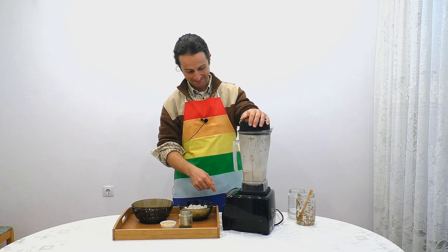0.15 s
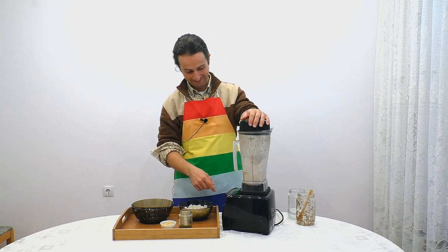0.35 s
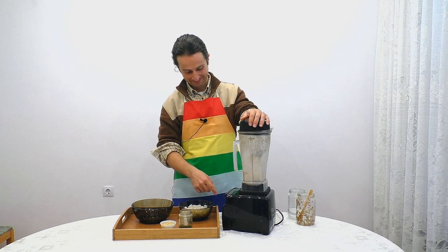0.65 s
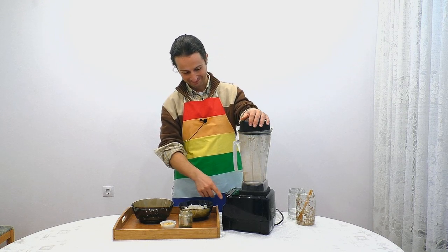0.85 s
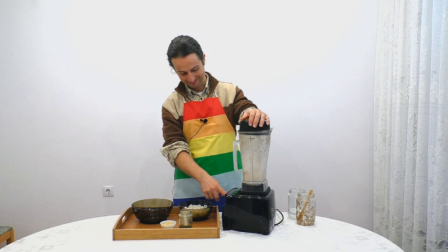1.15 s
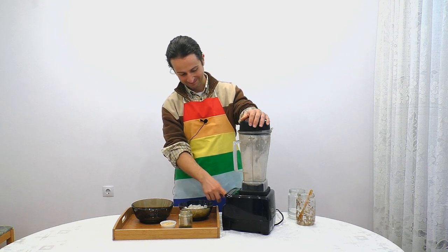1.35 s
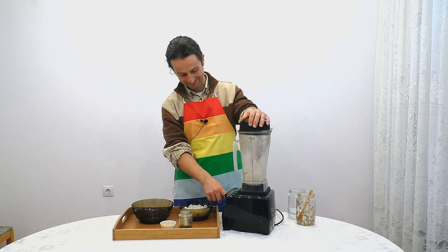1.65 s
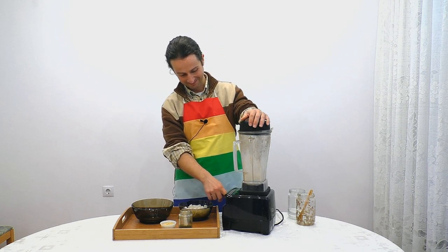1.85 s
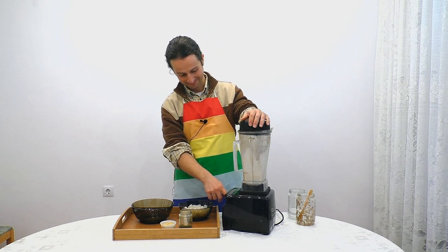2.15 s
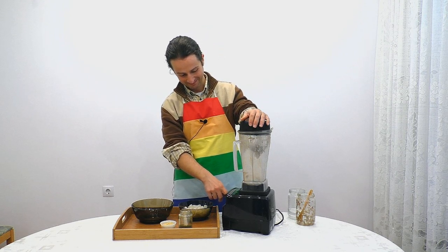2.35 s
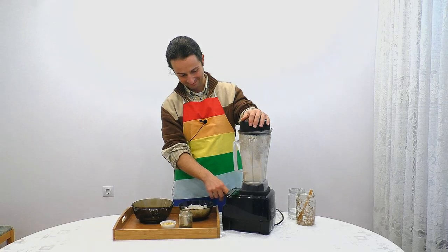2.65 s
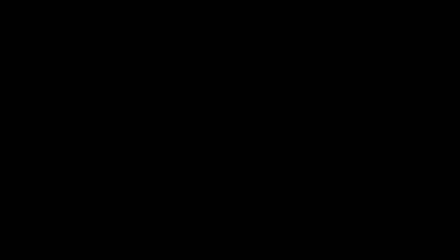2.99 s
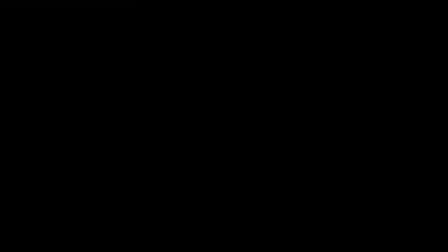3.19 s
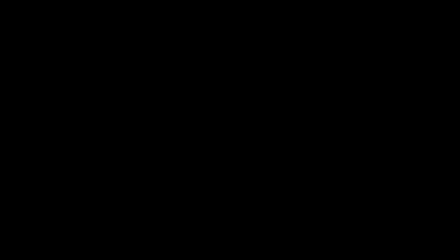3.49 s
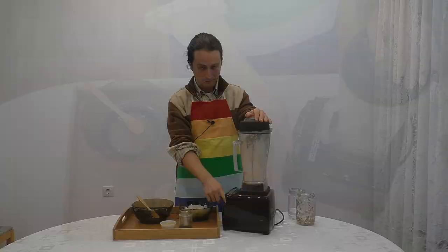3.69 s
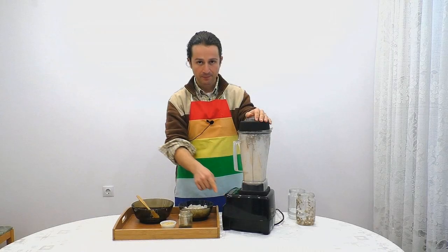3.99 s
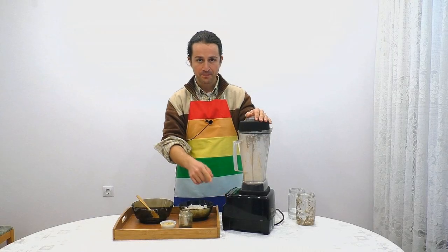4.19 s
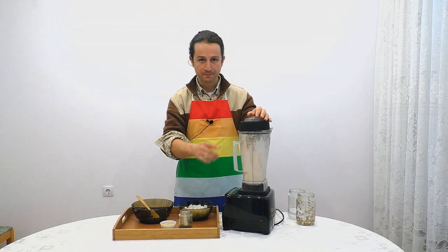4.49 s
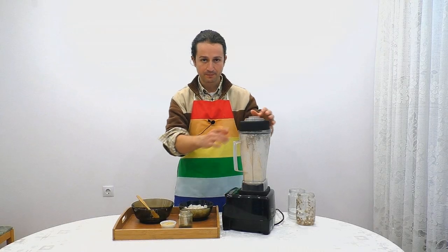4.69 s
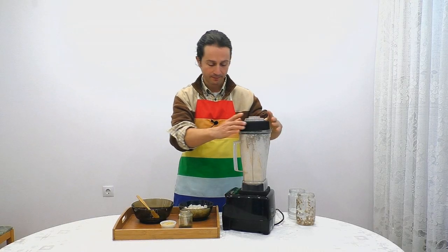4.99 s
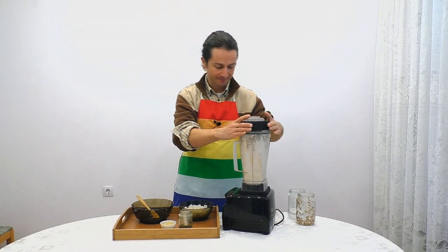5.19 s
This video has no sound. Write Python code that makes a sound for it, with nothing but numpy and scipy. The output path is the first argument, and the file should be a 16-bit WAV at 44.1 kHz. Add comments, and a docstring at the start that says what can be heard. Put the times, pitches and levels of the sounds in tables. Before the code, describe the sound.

A blender grinds seeds in water with a surging motor, cuts to silence, returns briefly, then clicks off and winds down in falling pitch.

```python
"""Blender grinding seeds

A blender grinds seeds in water on a table: shaft-order hum, armature slot whine, blade blows and fan air.
Its motor hunts up and down in speed about three times a second, and seeds knock the jar in noise bursts.
The sound fades out, stays silent and fades in again; the switch snaps off and the shaft coasts down.
Just before 5 s the blender drops away: room hiss and low rumble come up, with fingers tapping the lid.
"""
import sys
import numpy as np
from scipy import signal
from scipy.fft import rfft, irfft, next_fast_len
from scipy.io import wavfile

SR = 44100
rng = np.random.default_rng(int(sys.argv[2]) if len(sys.argv) > 2 else 0)


def output_pcm(signal):
    """Save a mono or channel-first signal as 16-bit PCM at the path in sys.argv[1].

    Samples are clipped to [-1, 1] before scaling.
    """
    pcm = np.clip(np.atleast_2d(signal).T, -1, 1) * 32767
    wavfile.write(sys.argv[1], SR, np.round(pcm).astype(np.int16))


def gain_from_decibels(decibels):
    """Convert decibel values to linear amplitude factors."""
    exponent = np.asarray(decibels, float) / 20
    return 10 ** exponent


N = 235579
MAINS_PULSE_HZ = 100
SWITCH_OFF_S, SILENCE_S = 3.912, 3.4


def rms_one(x):
    """Scale to rms 1."""
    return x / np.sqrt(np.mean(x ** 2) + 1e-20)


def drift(rate_hz):
    """Slow random wander of rms about 1: noise through two equal one-pole lowpasses."""
    r = np.exp(-2 * np.pi * rate_hz / SR)
    noise = rng.standard_normal(N + SR)
    return rms_one(signal.lfilter([1], [1, -2 * r, r * r], noise)[SR:])


def response_db(hz, spectrum, resonances):
    """Smooth spectrum with bell-shaped resonances added in dB."""
    points = np.array(spectrum)
    level_db = np.interp(np.log(hz + 1), np.log(points[:, 0]), points[:, 1])
    return level_db + sum(db / (1 + (2 * (hz - centre) / width) ** 2) for centre, width, db in resonances)


def colour(x, spectrum, resonances=()):
    """Minimum-phase filter: nothing rings before it is struck."""
    size = next_fast_len(N + SR)
    gain = gain_from_decibels(response_db(np.fft.rfftfreq(size, 1 / SR), spectrum, resonances))
    cepstrum = irfft(np.log(gain), size)
    # fold onto positive time
    cepstrum[1:size // 2] *= 2
    cepstrum[size // 2 + 1:] = 0
    return irfft(rfft(x, size) * np.exp(rfft(cepstrum)), size)[:N]


def grains(per_s, spread_db):
    """Random clicks of uneven size and either sign."""
    sizes = gain_from_decibels(spread_db * np.minimum(rng.exponential(1, N), 5)) * rng.choice([-1, 1], N)
    return sizes * (rng.random(N) < per_s / SR)


def puffs(events, decay_s):
    """Short decaying noise bursts at the given moments."""
    out = np.zeros(N + 800)
    fade = np.exp(-np.arange(800) / (decay_s * SR))
    for (s, db), noise in zip(events, rng.standard_normal((len(events), 800))):
        start = round(s * SR)
        out[start:start + 800] += gain_from_decibels(db) * fade * noise
    return out[:N]


# fastest and slowest moments of the hunting motor, in turn: t/s, speed/(turns/s)
SPEED_TURNING_POINTS = [(-0.042, 193.2), (0.094, 178.3), (0.279, 193.5), (0.436, 174.8), (0.588, 195.3),
                        (0.742, 176.5), (0.922, 195.0), (1.068, 173.6), (1.252, 196.4), (1.412, 175.5),
                        (1.605, 197.2), (1.785, 175.6), (1.968, 195.5), (2.1, 172.0), (2.295, 197.4),
                        (2.453, 173.8), (2.634, 198.4), (2.809, 177.8), (2.994, 196.4), (3.13, 174.8),
                        (3.62, 196.0), (3.73, 193.8), (3.9, 200.4)]


def shaft_speed():
    """Speed swings between turning points; after switch-off, friction and square-law drag slow it."""
    t = np.arange(N) / SR
    s, turning = np.transpose(SPEED_TURNING_POINTS)
    count = np.arange(len(s))
    place = np.interp(t, s, count)
    height = (.5 + .5 * np.cos(np.pi * place)) ** .85   # exponent < 1 lingers at the top
    step = np.floor(place)
    driven = np.interp(step + np.where(step % 2, height, 1 - height), count, turning)
    friction, drag = 138, .0059   # loss of turns/s per s: friction + drag * speed^2
    balance = np.sqrt(friction / drag)
    angle = np.arctan(turning[-1] / balance) - np.sqrt(friction * drag) * (t - SWITCH_OFF_S)
    coasting = balance * np.tan(np.clip(angle, 0, np.pi / 3))
    return np.where(t < SWITCH_OFF_S, driven, coasting), place / 2 % 1


# base levels between surges: t/s, hum level/dB, churning level/dB, spray level/dB, whine level/dB
VOICE_LEVELS = [(0, -34, -31, -43.5, -44.5), (.45, -39.5, -33, -46, -49), (.9, -38, -33, -45, -47.5),
                (1.45, -42.5, -34.5, -47.5, -44), (1.85, -37, -32, -44, -45.5), (2.2, -40.5, -34, -48, -45),
                (2.6, -40, -32, -46, -44), (3.06, -42.5, -33, -48.5, -48), (3.67, -40, -30, -43.5, -45.5),
                (3.8, -38.5, -30, -43.5, -46), (3.9, -41, -30, -45.5, -44), (3.97, -37, -31.5, -45, -51.5),
                (4.15, -42, -32, -51, -52), (4.298, -46.5, -34, -50, -56), (4.6, -58, -37.5, -51, -59.5),
                (4.78, -58, -41.5, -58.5, -60.5), (4.87, -59, -49.5, -71.5, -69),
                (4.96, -81, -55, -69.5, -77)]
# one swing, fastest through slowest (.5) and back: share of swing, hum change/dB, whine change/dB
SWING_LEVELS = [(0, 2, 0.5), (.1, -3, -1.5), (.24, -3.5, -1), (0.359, 4.5, -10.5), (.5, 0, -1),
                (.62, -4, -8), (.76, -4, -1.5), (.88, 4, -2.5), (1, 4.5, 1.5)]
# seed mix falls back on the blades: t/s, churning rise/dB, spray rise/dB
FALLBACK_SURGES = [(0.03, 3, 5.5), (0.375, 5, 6.5), (0.665, 6.5, 7), (1.008, 8, 5.5), (1.327, 7.5, 6.5),
                   (1.705, 6.5, 6), (2.035, 7, 1.5), (2.388, 7.5, 6), (2.721, 4, 6.5), (3.06, 3, 2),
                   (3.68, 6, 5)]


def source_levels(swing_share):
    """Hum and whine follow the swing until the silence; churning and spray rise in surges."""
    t = np.arange(N) / SR
    s, hum_db, churn_db, spray_db, whine_db = np.transpose(VOICE_LEVELS)
    share, hum_swing_db, whine_swing_db = np.transpose(SWING_LEVELS)
    hunting = t < SILENCE_S
    s_surge, churn_rise_db, spray_rise_db = np.transpose(FALLBACK_SURGES)
    since = t - s_surge[:, None]
    rise_s, fall_s = 0.049, 0.047
    bumps = np.exp(-.5 * (since / np.where(since < 0, rise_s, fall_s)) ** 2)
    hum_now = np.interp(t, s, hum_db) + hunting * np.interp(swing_share, share, hum_swing_db)
    whine_now = np.interp(t, s, whine_db) + hunting * np.interp(swing_share, share, whine_swing_db)
    churn_now = np.interp(t, s, churn_db) + churn_rise_db @ bumps
    spray_now = np.interp(t, s, spray_db) + spray_rise_db @ bumps
    return hum_now, whine_now, churn_now, spray_now


# low shaft orders: multiple of shaft rate, level/dB re hum
HUM_ORDERS = [(1, -1), (2, -6), (3, -7), (4, -9), (5, -7), (10, -16.5), (12, -24.5)]
# low room and table modes: f/Hz, t60/s, level at resonance/dB
LOW_MODES = [(60.6, 0.62, 8.5), (100.3, 0.9, 4.5), (128.5, 0.43, 16.5), (145.6, 0.69, 9),
             (177.7, 0.39, 6.5), (195.8, 0.96, 15), (294, 0.21, 3), (357.4, 0.62, 8), (394.2, 0.67, 8),
             (528.4, .4, 0.5), (594.5, 0.35, 6.5), (780, 0.32, -1)]


def hum(turns, hum_db):
    """Unbalanced rotor shakes the base once a turn; modes ring on and beat with the gliding pitch."""
    t = np.arange(N) / SR
    tones = 0
    for k, db in HUM_ORDERS:
        level_db = db + 4.8 * (k > 1) * drift(17)
        tones = tones + gain_from_decibels(level_db) * np.sin(2 * np.pi * k * turns + k)
    # side tones a mains pulse away
    depth = 0.15 * gain_from_decibels(7.0 * drift(4.2)) * (t < SWITCH_OFF_S)
    torque = 1 + depth * np.cos(2 * np.pi * MAINS_PULSE_HZ * t)
    shake = np.sqrt(2) * gain_from_decibels(hum_db) * torque * tones
    # a small base radiates little bass
    out = gain_from_decibels(-3) * colour(shake, [(30, -23.5), (90, -8.5), (170, 0.5), (1000, -2)])
    for hz, t60, db in LOW_MODES:
        r, w = gain_from_decibels(-60 / (t60 * SR)), 2 * np.pi * hz / SR
        ring = signal.lfilter([(1 - r * r) / 2, 0, (r * r - 1) / 2], [1, -2 * r * np.cos(w), r * r], shake)
        out = out + gain_from_decibels(db) * ring
    return out


# armature slot orders: multiple of shaft rate, level/dB re whine, added level after silence/dB
WHINE_ORDERS = [(11, -7, 3), (22, -11, 9), (27, -17, 7), (44, 0, -1), (51, -16, -3), (58, -22, 8),
                (61, -13, 1), (66, -4.5, 3), (73, -15, -4), (88, -6, 5), (110, -2.5, 0), (132, -4.5, 0),
                (154, -7, 0), (176, -11, 0), (198, -11, 0), (220, -12, 0)]
# housing resonances: f/Hz, width/Hz, level/dB
HOUSING_RESONANCES = [(2185, 120, 16), (3350, 450, 15), (4300, 250, 5), (5300, 500, 11), (6400, 500, 15),
                      (7400, 200, 8), (7950, 330, 8), (8500, 450, 14), (9650, 280, 13), (10250, 300, 12),
                      (11700, 350, 7), (12900, 450, 7)]


def whine(speed, turns, whine_db):
    """Slot tones ride the speed, swell at housing resonances; the uneven air gap pulses them once a turn."""
    out = 0
    wobble_turns = .0009 * drift(60)
    later = np.arange(N) / SR > SILENCE_S
    tilt = [(100, -14), (10500, -11), (13200, -14), (15000, -19), (16500, -70)]
    for k, db, later_db in WHINE_ORDERS:
        housing_db = response_db(k * speed, tilt, HOUSING_RESONANCES)
        level_db = db + later_db * later + housing_db + 2.0 * drift(40)
        out = out + gain_from_decibels(level_db) * np.sin(2 * np.pi * k * (turns + wobble_turns))
    pulse = 1 + .25 * np.cos(2 * np.pi * turns)
    return np.sqrt(2) * gain_from_decibels(whine_db) * pulse * out


def room(x):
    """Reverberation as a dull noise tail that dies away."""
    t60_s, room_db = .4, -11
    t = np.arange(int(.6 * SR)) / SR
    dull = signal.lfilter([.4], [1, -.6], rng.standard_normal(len(t)))
    tail = dull * gain_from_decibels(-60 * t / t60_s) * (t > .006)
    return gain_from_decibels(room_db) * signal.fftconvolve(x, tail / np.sqrt(np.sum(tail ** 2)))[:N]


# hard grinding spectrum: f/Hz, relative level per Hz/dB
GRIND_SPECTRUM = [(25, -48.5), (60, -23), (150, -13), (260, -8.5), (500, -5), (1100, -8.5), (2200, -11.5),
                  (2700, -21.5), (4000, -27), (8000, -39)]
# blade blows in water, sloshing as the blades slow: f/Hz, relative level per Hz/dB
SLOSH_SPECTRUM = [(25, -38), (70, -19), (120, -4.5), (300, -8), (530, -3.5), (800, -12.5), (1700, -14.5),
                  (3300, -20), (4200, -33), (8000, -48.5)]
# spray spectrum: f/Hz, relative level per Hz/dB
SPRAY_SPECTRUM = [(1500, -24.5), (2700, 5), (4000, 0.5), (6000, -1.5), (7200, 1.5), (9000, -7),
                  (16000, -19.5)]
# jar and table resonances: f/Hz, width/Hz, level/dB
JAR_RESONANCES = [(123, 17, 4), (363, 45, 4.5), (550, 85, 5.5), (821.6, 76, 7.5), (1515, 290, 4),
                  (1801, 80, 6), (2060, 41, 4), (2170, 14, 8)]
# housing colours noise more gently than tones: f/Hz, width/Hz, level/dB
VENT_RESONANCES = [(hz, width, .25 * db) for hz, width, db in HOUSING_RESONANCES]


def churning(speed, turns, churn_db, spray_db):
    """Blade blows on seeds and water ring the jar; throb follows the turn and, under power, mains torque."""
    t = np.arange(N) / SR
    torque = 0.13 * (t < SWITCH_OFF_S) * np.cos(2 * np.pi * MAINS_PULSE_HZ * t)
    throb = 1 + 0.073 * np.cos(2 * np.pi * turns) + torque
    blows = rms_one(grains(2500, spread_db=3.0)) * throb * gain_from_decibels(1.03 * drift(25))
    water = rng.standard_normal((2, N))
    grinding_share = np.clip((speed - 60) / 120, 0, 1)   # rest is loose slosh
    grind = rms_one(colour(blows + 0.93 * water[0], GRIND_SPECTRUM, JAR_RESONANCES))
    slosh = rms_one(colour(blows + 0.74 * water[0], SLOSH_SPECTRUM, JAR_RESONANCES))
    droplets = .5 * blows + water[1] * throb * gain_from_decibels(1.6 * drift(12))
    spray = rms_one(colour(droplets, SPRAY_SPECTRUM, VENT_RESONANCES))
    return gain_from_decibels(churn_db) * (grinding_share * grind + (1 - grinding_share) * slosh) + gain_from_decibels(spray_db) * spray


# cooling air spectrum: f/Hz, relative level per Hz/dB
FAN_SPECTRUM = [(2000, -13.5), (5000, 1), (9000, -0.5), (11500, -1), (14000, -0.5), (16000, -6)]


def fan(speed, turns):
    """Cooling air hisses through the housing, louder with speed, fluttering once a turn."""
    flutter = (1 + 0.16 * np.cos(2 * np.pi * turns)) * gain_from_decibels(.7 * drift(30))
    air = rng.standard_normal(N) + 0.37 * rms_one(grains(1000, spread_db=5.5))
    hiss = rms_one(colour(air, FAN_SPECTRUM, VENT_RESONANCES))
    return gain_from_decibels(-46.0) * (speed / 190) ** 0.89 * flutter * hiss


# room hiss and rumble: f/Hz, relative level per Hz/dB
ROOM_SPECTRUM = [(12, -30.5), (20, 0.5), (70, -13), (113, -10), (181, -14.5), (253, -18.5), (283, -20),
                 (523, -20.5), (635, -23), (1170, -25.5), (15700, -40)]


def room_tone(fader):
    """Room hiss and lumpy rumble: faint under the blender, turned up as it drops away."""
    rise_start_s, rise_s = 4.985, .014
    rise = np.clip((np.arange(N) / SR - rise_start_s) / rise_s, 0, 1)
    noise = colour(rng.standard_normal(N) * gain_from_decibels(0.78 * drift(6.7)), ROOM_SPECTRUM)
    return gain_from_decibels(-50.5) * rms_one(noise) * (rise + gain_from_decibels(-15) * fader)


# seeds against the jar: t/s, burst level before filtering/dB
SEED_KNOCKS = [(1.118, -28.5), (1.329, -10), (1.889, -26), (2.008, -24.5), (2.033, -14), (2.061, -14.5),
               (2.101, -15.5), (3.725, -31), (4.477, -28), (4.521, -32.5), (4.545, -31.5), (4.8, -32.5)]
# seed rattling with mains torque: middle knock t/s, burst level before filtering/dB
SEED_RATTLES = [(1.525, -14), (2.589, -12)]
# thin treble ticks: t/s, burst level before filtering/dB
TREBLE_TICKS = [(0.354, -32), (1.026, -34.5), (2.131, -28.5), (2.837, -31)]


def knocks():
    """Seeds burst noise through the jar; rattles swell and fade over five knocks; ticks are treble only."""
    loss_db = 4.5   # per knock from the middle
    rattled = [(s + k / MAINS_PULSE_HZ, db - loss_db * abs(k)) for s, db in SEED_RATTLES for k in range(-2, 3)]
    seed_spectrum = [(200, -12), (600, -2), (2200, -2), (3200, -12), (5000, -12), (8000, -22), (16000, -40)]
    seeds = colour(puffs(SEED_KNOCKS + rattled, decay_s=.0025), seed_spectrum, JAR_RESONANCES)
    ticks = colour(puffs(TREBLE_TICKS, decay_s=.003), [(6000, -33.5), (11000, -10.5), (16000, -4.5)])
    return seeds + ticks


# rocker: t/s, snap level before filtering/dB, spring f/Hz, spring start level/dB, spring t60/s
ROCKER_SWITCH = (3.893, -30, 3887, -44, .5)


def switch():
    """Rocker snaps over as a noise burst; its spring rings on as a decaying sine."""
    s, snap_db, hz, spring_db, t60 = ROCKER_SWITCH
    t = np.maximum(np.arange(N) / SR - s, 0)
    spring = gain_from_decibels(spring_db - 60 * t / t60) * np.sin(2 * np.pi * hz * t)
    snap = puffs([(s, snap_db)], decay_s=0.0027)
    return spring + colour(snap, [(1000, -14.5), (3000, -0.5), (7000, -3.5), (14000, -11)])


# fingers on the lid: t/s, burst level before filtering/dB
FINGER_TAPS = [(4.994, -38.5), (5.002, -38), (5.039, -46), (5.085, -47), (5.209, -41.5), (5.221, -47)]
# lid resonances: f/Hz, width/Hz, level/dB
LID_RESONANCES = [(427, 150, 15), (885, 280, 9)]


def taps():
    """A fingertip gives a short dull puff through the lid."""
    return colour(puffs(FINGER_TAPS, decay_s=.003), [(100, 12), (2500, -3.5), (8000, -20)], LID_RESONANCES)


# fader on blender and faint room tone: t/s, gain 0-1
FADER_GAIN = [(0, 1), (2.989, 1), (3.084, 0), (3.642, 0), (3.9, 0.94), (4.965, 0.97), (4.985, 0.29)]


def scene():
    """Blender in its room under the fader, then the quiet room."""
    speed, swing_share = shaft_speed()
    hum_db, whine_db, churn_db, spray_db = source_levels(swing_share)
    turns = np.cumsum(speed) / SR
    slots = whine(speed, turns, whine_db)
    blender = hum(turns, hum_db) + slots + room(slots)
    blender = blender + churning(speed, turns, churn_db, spray_db) + fan(speed, turns)
    fader = np.interp(np.arange(N) / SR, *np.transpose(FADER_GAIN))
    return (fader * blender + room_tone(fader) + knocks() + switch() + taps())[None]


def low_pass(x):
    """Removes everything above the highest recorded frequency."""
    return signal.sosfilt(signal.butter(12, 16000, fs=SR, output="sos"), x)


def record(dry):
    """Pass on the finished mix."""
    return low_pass(dry)


dry = scene()
out = record(dry)
output_pcm(out)
```